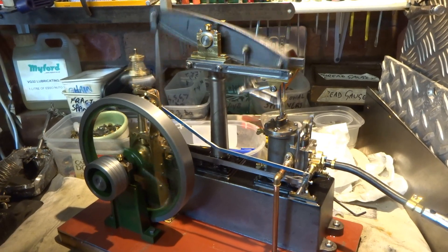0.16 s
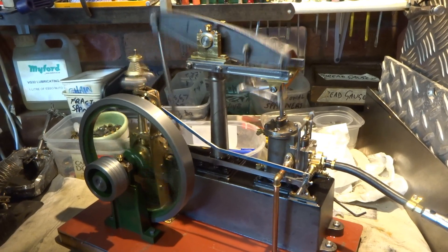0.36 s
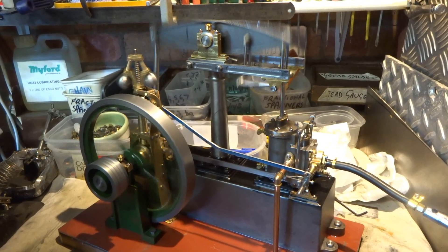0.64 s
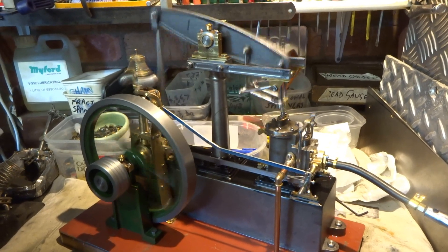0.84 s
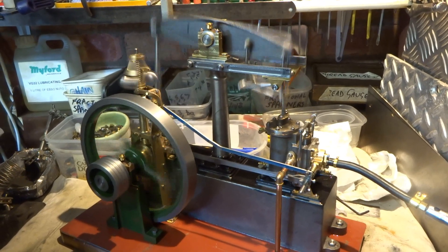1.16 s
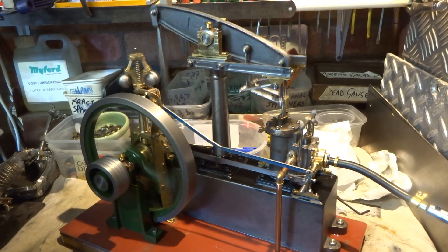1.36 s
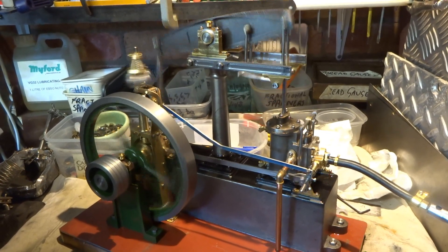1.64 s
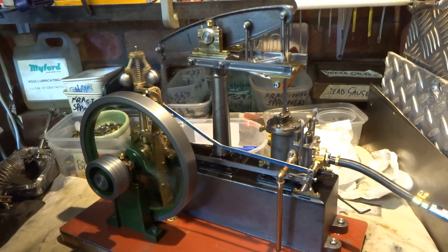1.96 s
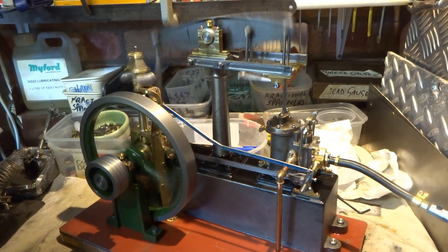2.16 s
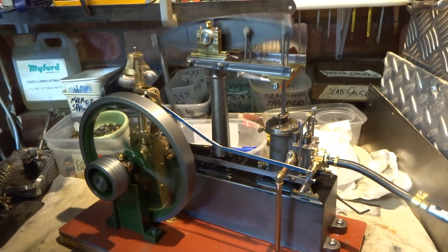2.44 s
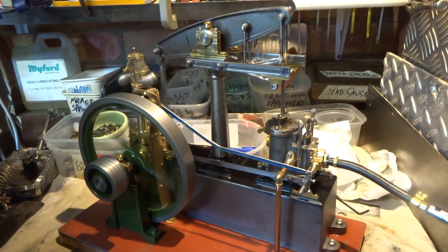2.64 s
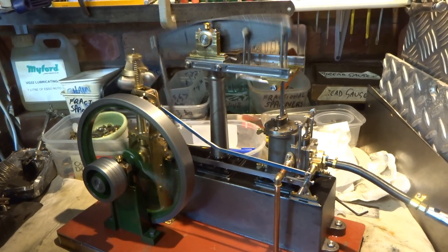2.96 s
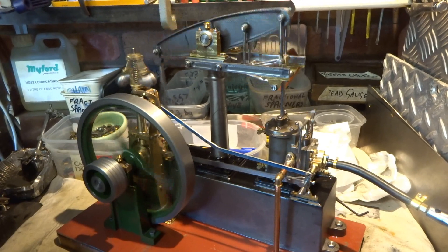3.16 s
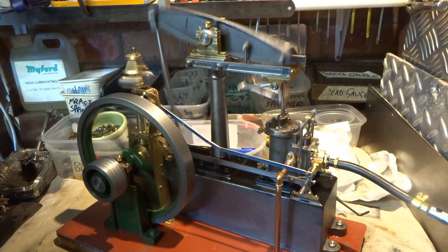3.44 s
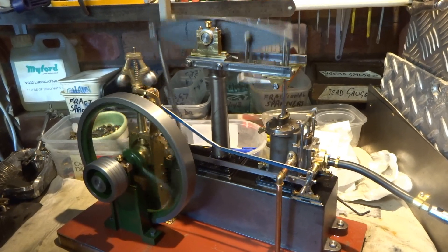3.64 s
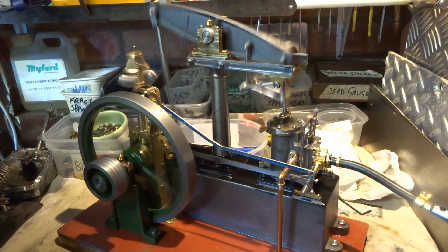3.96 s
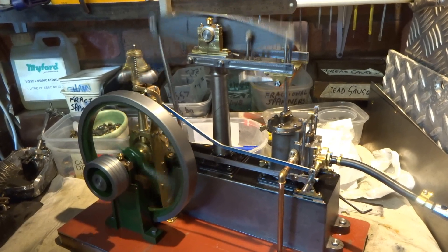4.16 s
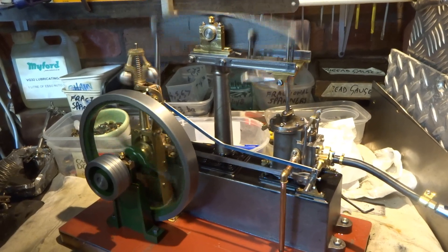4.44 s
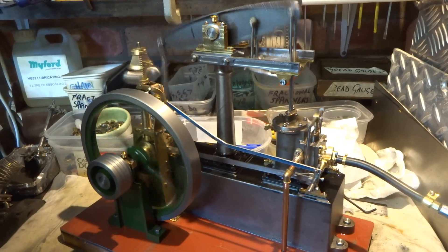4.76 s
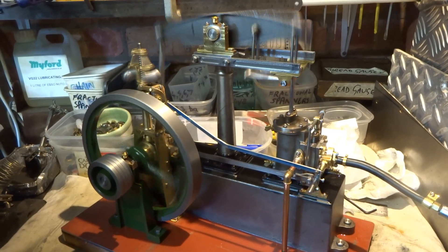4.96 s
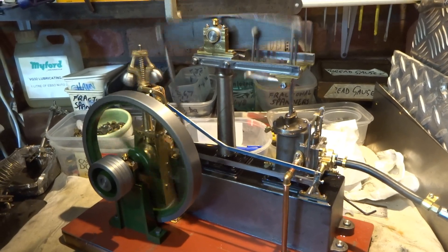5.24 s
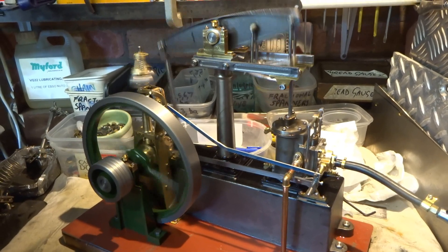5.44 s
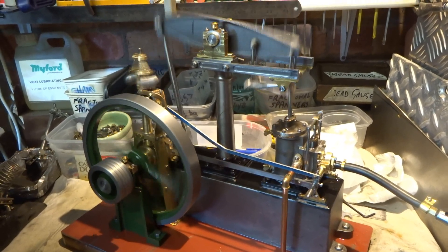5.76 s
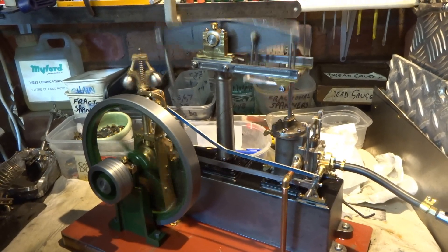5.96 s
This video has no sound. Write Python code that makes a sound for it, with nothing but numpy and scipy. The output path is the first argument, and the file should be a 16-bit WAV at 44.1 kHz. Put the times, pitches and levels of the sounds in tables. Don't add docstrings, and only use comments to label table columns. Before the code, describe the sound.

Loud, bright air hiss pulses in a quick two-part chuffing beat, already running at the start and continuing to the end. Each turn has a soft woody knock, then a crisp valve-gear clack with a small thud beneath. Thin metal and pipes ring faintly in the hiss; a very faint shop hum lies underneath. Close, dry, nearly mono pickup in a small workshop.

```python
import sys
import numpy as np
from scipy import signal
from scipy.fft import rfft, irfft, next_fast_len
from scipy.io import wavfile
from scipy.ndimage import map_coordinates

SR = 44100
rng = np.random.default_rng(int(sys.argv[2]) if len(sys.argv) > 2 else 0)


def generate_wav(signal):
    frames = np.transpose(np.atleast_2d(signal))
    scaled = np.clip(frames, -1, 1) * 32767
    pcm = np.round(scaled).astype(np.int16)
    wavfile.write(sys.argv[1], SR, pcm)


def invert_db(x):
    u = np.asarray(x, float) / 20
    return 10 ** u


N = 269451
TOP_HZ = 11030
TURN_COUNT = 36
TURN_S = .168375


def along(points, hz):
    point_hz, value = np.transpose(points)
    return np.interp(np.log(hz + 1), np.log(point_hz + 1), value)


def filtered(x, response):
    size = next_fast_len(N + SR // 2)
    hz = np.fft.rfftfreq(size, 1 / SR)
    return irfft(rfft(x, size) * response(hz), size)[..., :N]


def wobble(rate):
    knots = rng.standard_normal(int(N * rate / SR) + 4)
    return map_coordinates(knots, [np.arange(N) * rate / SR])


def knocks():
    k = np.arange(TURN_COUNT)
    lengths = TURN_S + .00017376 * k + .000006254 * k ** 2
    hunt = .0004 * np.cos(2 * np.pi * (k - 13) / 14.5)
    return -.00609 + np.cumsum(lengths) - lengths - hunt, lengths


def crank():
    starts, lengths = knocks()
    ends = np.r_[starts, starts[-1] + lengths[-1]]
    return np.interp(np.arange(N) / SR, ends, np.arange(TURN_COUNT + 1))


# pitch_hz, likeness (0 to 1)
LIKENESS = [(60, 0.91), (220, 0.99), (830, 0.91), (3110, 0.91), (11600, 0.92)]


def jet(colour, resonances):
    def response(hz):
        lift = 1
        for pitch_hz, width_hz, lift_db in resonances:
            lift = lift + (invert_db(2 * lift_db) - 1) / (1 + (2.05 * (hz - pitch_hz) / width_hz) ** 2) ** 2
        angle = np.arccos(np.clip(along(LIKENESS, hz), -1, 1)) / 2
        loudness = invert_db(along(colour, hz)) * np.sqrt(np.abs(lift)) * (hz < TOP_HZ)
        return loudness * [np.cos(angle), np.sin(angle)]
    mid, side = filtered(rng.standard_normal((2, N)), response)
    return np.array([mid + side, mid - side]) / np.sqrt(np.mean(mid ** 2 + side ** 2))


def valve(turns, puffs):
    full, hold, level_db, rise, fall = np.transpose(puffs)[..., None]
    since = (turns - full) % 1
    falling = np.maximum(since - hold, 0) / np.abs(fall)
    rising = (1 - since) / np.abs(rise)
    below_db = 20 * np.minimum(falling, rising)
    return 10 * np.log10(np.sum(invert_db(2 * (level_db - below_db)), axis=0))


def clutter(x, t60, level_db):
    t = np.arange(SR // 8) / SR
    tail = rng.standard_normal(len(t)) * invert_db(-60 * t / t60) * (t > .001)
    tail = tail[None] / np.linalg.norm(tail)
    return x + invert_db(level_db) * signal.fftconvolve(x, tail, axes=1)[:, :N]


def air_path(turns, colour, resonances, puffs):
    flow_db = valve(turns, puffs) + 1.02 * wobble(40)
    return invert_db(flow_db) * clutter(jet(colour, resonances), t60=0.14, level_db=-5.5)


# pitch_hz, width_hz, lift_db
PORT_RESONANCES = [(1220.0, 440.0, 13.8), (1970.0, 750.0, 11.2), (2840.0, 300.0, 14.0),
                   (3140.0, 140.0, 8.5), (3720.0, 530.0, 12.8), (4500.0, 900.0, 10.2),
                   (4970.0, 190.0, 10.1), (5330.0, 350.0, 8.6), (5800.0, 150.0, 8.0), (6180.0, 490.0, 6.8),
                   (6630.0, 230.0, 8.5), (8230.0, 180.0, 5.0), (9860.0, 220.0, 4.4), (10840.0, 630.0, 5.0)]
# pitch_hz, level_db (per Hz)
PORT_COLOUR = [(100, -42), (250, -20), (450, -3), (650, -16), (1200, -19), (2000, -8), (5000, -7),
               (7500, -3.5), (11000, 1.5)]
# full_turn, hold_turn, level_db, rise_turn, fall_turn (shares of a turn; 20 dB slopes)
PORT_PUFFS = [
    (.028, 0.044, -19.5, 0.024, 0.24),
    (.27, 0.051, -27, 0.11, .14),
    (.45, 0, -32, .2, 0.16),
    (.62, 0.029, -22, 0.079, 0.044),
    (.84, 0.072, -32, 0.26, 0.09),
]


def port_air(turns):
    return air_path(turns, PORT_COLOUR, PORT_RESONANCES, PORT_PUFFS)


# pitch_hz, width_hz, lift_db
PIPE_RESONANCES = [(900.0, 420.0, 6.6), (2110.0, 710.0, 10.5), (2840.0, 180.0, 14.0), (3140.0, 150.0, 8.1),
                   (3770.0, 390.0, 8.5), (4990.0, 170.0, 9.6), (5260.0, 160.0, 5.3), (6140.0, 170.0, 7.9),
                   (6520.0, 430.0, 10.6), (7410.0, 210.0, 5.6), (8200.0, 250.0, 12.6), (8430.0, 510.0, 8.0),
                   (9380.0, 340.0, 8.9), (9930.0, 660.0, 11.1), (10720.0, 900.0, 6.3)]
# pitch_hz, level_db (per Hz)
PIPE_COLOUR = [(100, -52), (250, -30), (450, -49), (650, -23), (1200, -8.5), (2000, -9), (5000, -5),
               (7500, -5.5), (11000, -7.5)]
# full_turn, hold_turn, level_db, rise_turn, fall_turn (shares of a turn; 20 dB slopes)
PIPE_PUFFS = [
    (0.065, .31, -25, 0.02, 0.14),
    (0.39, .13, -39.5, .1, .1),
    (0.658, 0.029, -21.5, .085, 0.15),
    (.005, .03, -49, .12, .1),
]


def pipe_air(turns):
    return air_path(turns, PIPE_COLOUR, PIPE_RESONANCES, PIPE_PUFFS)


# pitch_hz, width_hz, lift_db
CYLINDER_RESONANCES = [(1080.0, 900.0, 4.8), (1690.0, 190.0, 9.0), (2060.0, 900.0, 8.2),
                       (2890.0, 860.0, 8.1), (3240.0, 200.0, 10.7), (3720.0, 900.0, 14.0),
                       (4800.0, 790.0, 9.5), (5500.0, 460.0, 7.3), (6130.0, 630.0, 7.3),
                       (7090.0, 300.0, 4.0), (9670.0, 360.0, 5.9), (10640.0, 900.0, 7.3)]
# pitch_hz, level_db (per Hz)
CYLINDER_COLOUR = [(100, -54), (250, -6), (450, -9.5), (650, -9), (1200, -3), (2000, -6.5), (5000, -11.5),
                   (7500, -2.5), (11000, -5.5)]
# full_turn, hold_turn, level_db, rise_turn, fall_turn (shares of a turn; 20 dB slopes)
CYLINDER_PUFFS = [
    (.11, .27, -25.5, 0.14, 0.21),
    (.47, 0.14, -22.5, 0.18, 0.08),
    (0.721, 0.091, -25.5, 0.019, 0.23),
]


def cylinder_air(turns):
    return air_path(turns, CYLINDER_COLOUR, CYLINDER_RESONANCES, CYLINDER_PUFFS)


# pitch_hz, width_hz, lift_db
SEAL_RESONANCES = [(1280.0, 120.0, 2.8), (1990.0, 500.0, 5.5), (2990.0, 230.0, 9.4), (3630.0, 900.0, 12.2),
                   (4070.0, 270.0, 11.8), (4780.0, 670.0, 14.0), (5390.0, 350.0, 13.6),
                   (5930.0, 420.0, 9.6), (6430.0, 830.0, 7.1), (7050.0, 300.0, 5.6), (7610.0, 900.0, 3.2),
                   (8660.0, 510.0, 2.8), (9690.0, 440.0, 3.9), (10040.0, 470.0, 2.9)]
# pitch_hz, level_db (per Hz)
SEAL_COLOUR = [(100, -32), (250, -12), (450, -6), (650, -10.5), (1200, -4), (2000, -4), (5000, -12),
               (7500, -2), (11000, 0.5)]
# full_turn, hold_turn, level_db, rise_turn, fall_turn (shares of a turn; 20 dB slopes)
SEAL_PUFFS = [
    (.16, 0.057, -30.5, 0.13, 0.25),
    (.33, 0.054, -30.5, 0.24, 0.24),
    (.52, 0.057, -29, 0.18, .11),
    (.69, .01, -30, .11, 0.14),
    (.95, 0.056, -26.5, 0.37, 0.046),
]


def seal_air(turns):
    return air_path(turns, SEAL_COLOUR, SEAL_RESONANCES, SEAL_PUFFS)


# pitch_hz, width_hz, lift_db
AIR_BANDS = [(640, 80, -3), (770, 110, 3.5), (950, 150, -1.5), (2870, 50, 2), (3126, 45, 4), (5010, 50, 5),
             (5228, 35, 5), (6287, 50, 3.5), (8170, 60, 3.5), (8295, 40, 3), (9323, 60, 3), (9816, 45, 3.5)]


def singing(x):
    def response(hz):
        total = 1
        for pitch_hz, width_hz, lift_db in AIR_BANDS:
            damping = 1j * hz * width_hz
            total = total + (invert_db(lift_db) - 1) * damping / (pitch_hz ** 2 - hz * hz + damping)
        return total
    return filtered(x, response)


def air():
    turns = crank()
    supply_db = 0.28 * wobble(4 / TURN_S) + 0.37 * wobble(160)
    paths = port_air(turns) + pipe_air(turns) + cylinder_air(turns) + seal_air(turns)
    return singing(invert_db(-0.82 + supply_db) * paths)


# start_s, knock_db, clack_db, thud_db, rebound_db
JOINT_PLAY = [
    (0, .6, 0, -1.9, -12),
    (1.4, .6, .8, -.8, -7),
    (2.5, 1.6, .6, -.5, -1.5),
    (3.9, .3, 1.5, 0, 0),
    (4.4, 0, 2.6, -1, 1),
    (4.9, -4, 2, -2, 1),
    (5.3, -4, 1, -2.4, -2),
    (5.6, -4, .8, -1, -8),
    (6.1, -4, 1, -1, -8),
]


def blows():
    knock_s, lengths = knocks()
    clack_s = knock_s + .58 * lengths + .0281
    start_s, *play_db = np.transpose(JOINT_PLAY)
    chance_db = 0.3 * rng.standard_normal((len(play_db), TURN_COUNT))
    levels_db = [np.interp(knock_s, start_s, db) + chance for db, chance in zip(play_db, chance_db)]
    return knock_s, clack_s, levels_db


def strikes(times, levels_db, modes, attack, scatter_db):
    out = np.zeros(N + 2 * SR)
    t = np.arange(SR // 5) / SR
    pitch_hz, level, t60_s, swing = np.transpose(modes)[..., None]
    fade = invert_db(level - 60 * t / t60_s)
    ring = swing * fade * np.sin(2 * np.pi * pitch_hz * t) * (1 - np.exp(-t / attack))
    chances = rng.standard_normal((len(times), len(modes)))
    for start_s, level_db, chance in zip(times, levels_db, chances):
        first = round(start_s * SR) + SR
        out[first:first + len(t)] += invert_db(level_db + scatter_db * chance) @ ring
    return out[SR:N + SR]


# pitch_hz, level_db, t60_s, first_swing (direction)
BASE = [(235, -45.1, 0.2, -1), (295, -30.5, 0.043, -1), (381, -28.4, 0.032, 1), (452, -26.5, 0.025, 1),
        (539, -18.4, 0.01, -1)]


def base_knock(knock_s, knock_db):
    return invert_db(0.5) * strikes(knock_s - .00328, knock_db / 2, BASE, attack=.00139, scatter_db=.6)


def link_rebound(clack_s, rebound_db):
    return strikes(clack_s + 0.0119, rebound_db - 1, BASE[1:], attack=0.0014, scatter_db=1.2)


# pitch_hz, level_db, t60_s, first_swing (direction)
THUD = [(222, -46.4, 0.2, -1), (280, -42.2, 0.2, -1), (428, -38.1, 0.124, 1), (492, -30.4, 0.062, -1),
        (528, -38.1, 0.117, 1), (563, -24.8, 0.01, 1), (801, -39.4, 0.082, 1)]


def clack_thud(clack_s, thud_db):
    return invert_db(-3.0) * strikes(clack_s - .00258, thud_db / 2, THUD, attack=.0002, scatter_db=1)


# pitch_hz, level_db, t60_s, first_swing (direction and size)
BENCH = [(186, -36, 0.11, 0.43), (210, -41.5, 0.07, -1.5), (341.6, -38, 0.2, 0.76)]


def bench_top(knock_s, knock_db, clack_s, thud_db):
    levels_db = np.r_[knock_db, thud_db - 1.4] / 2
    return strikes(np.r_[knock_s, clack_s], levels_db, BENCH, attack=0.0098, scatter_db=4.5)


# pitch_hz, level_db, t60_s, first_swing (direction)
GEAR = [(1045, -33.7, 0.092, -1), (1490, -27.7, 0.042, 1), (1567, -18.3, 0.026, 1), (1655, -10.0, 0.01, -1),
        (1892, -8.0, 0.01, 1), (1927, -13.7, 0.026, -1), (2159, -36.0, 0.05, -1)]
# pitch_hz, level_db, t60_s, first_swing (direction and size)
PINS = [(2917, -26, 0.05, 0.68), (3130, -35, 0.025, -0.29), (6630, -16.5, 0.016, 0.97),
        (7200, -28, .02, -1)]


def valve_clack(clack_s, clack_db):
    clack = strikes(clack_s - .00376, clack_db, GEAR, attack=.00165, scatter_db=.4)
    pins = strikes(clack_s - .003, clack_db, PINS, attack=0.0011, scatter_db=6.0)
    return invert_db(-0.9) * clack + pins


# delay_s, share (negative is upside down)
ECHOES = [
    (.01315, .3),
    (.01726, .36),
    (.02667, -.09),
    (.03649, -.21),
]


def walls(x):
    skew_s = np.array([[1], [-1]]) * .00008

    def response(hz):
        total = 0
        for k, (delay_s, share) in enumerate(ECHOES):
            side_delay_s = delay_s + (-1) ** k * skew_s
            total = total + share * np.exp(-2j * np.pi * hz * side_delay_s)
        return total
    return filtered(x, response)


def gear():
    knock_s, clack_s, (knock_db, clack_db, thud_db, rebound_db) = blows()
    low = base_knock(knock_s, knock_db) + clack_thud(clack_s, thud_db)
    low = low + link_rebound(clack_s, rebound_db) + bench_top(knock_s, knock_db, clack_s, thud_db)
    return low + walls(low) + valve_clack(clack_s, clack_db)


# pitch_hz, level_db (per Hz)
SHOP = [(25, -17), (60, -5), (130, -7), (200, -14), (300, 2), (520, -9), (640, -16), (800, 7), (2000, -23)]


def shop_hum():
    return invert_db(-65 + 6 * wobble(6)) * jet(SHOP, [])


def scene():
    engine = filtered(air() + gear(), lambda hz: (1j * hz / (110 + 1j * hz)) ** 4)
    return invert_db([[-.27], [.27]]) * engine + shop_hum()


def roll_off(x):
    return signal.sosfilt(signal.butter(12, 12180, fs=SR, output="sos"), x)


def record(dry):
    mix = filtered(dry, lambda hz: hz < TOP_HZ)
    return roll_off(mix)


dry = scene()
out = record(dry)
generate_wav(out)
```